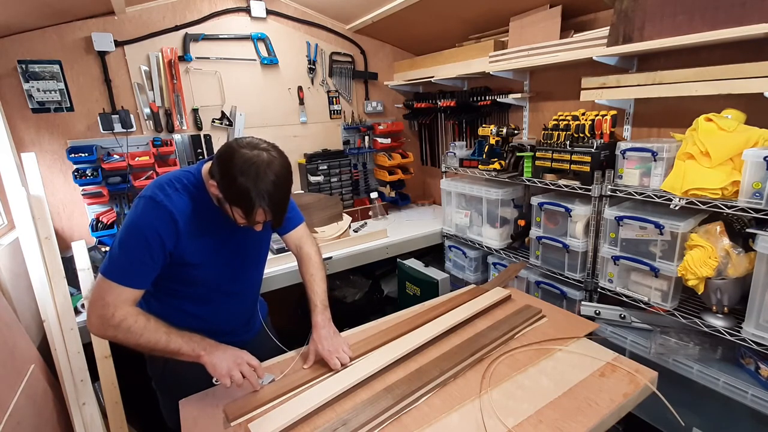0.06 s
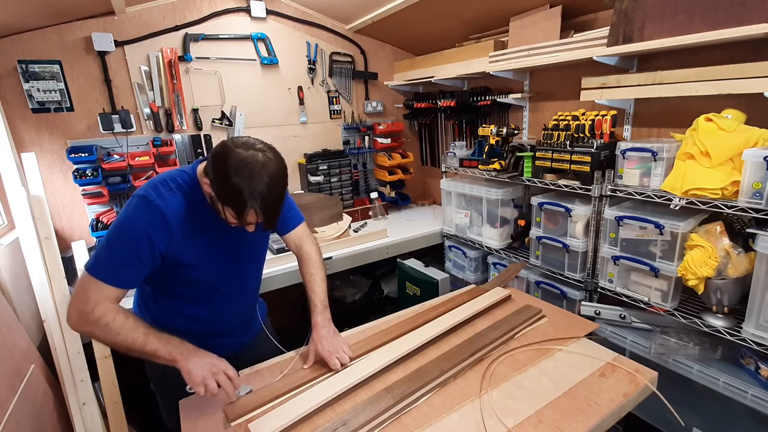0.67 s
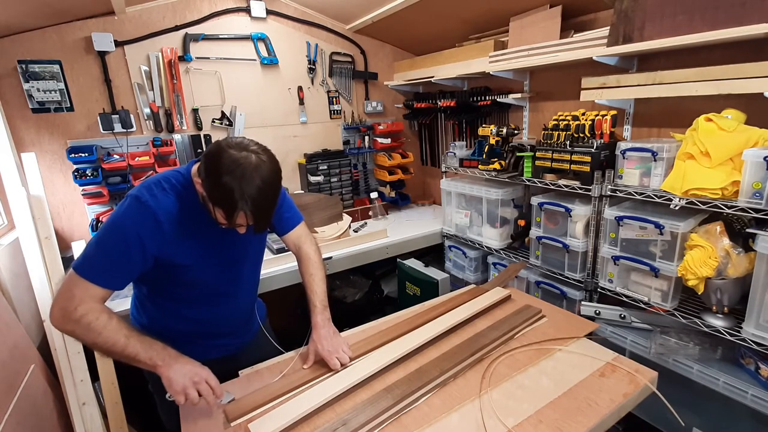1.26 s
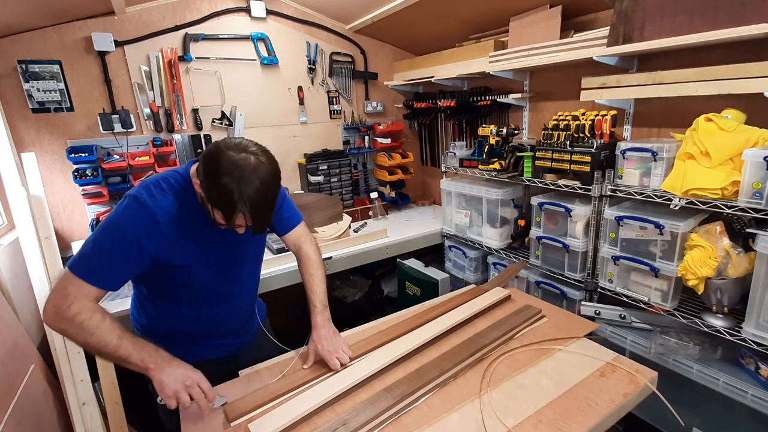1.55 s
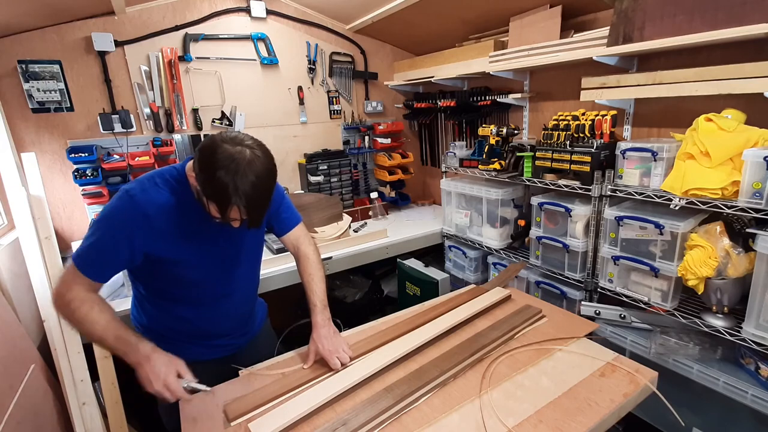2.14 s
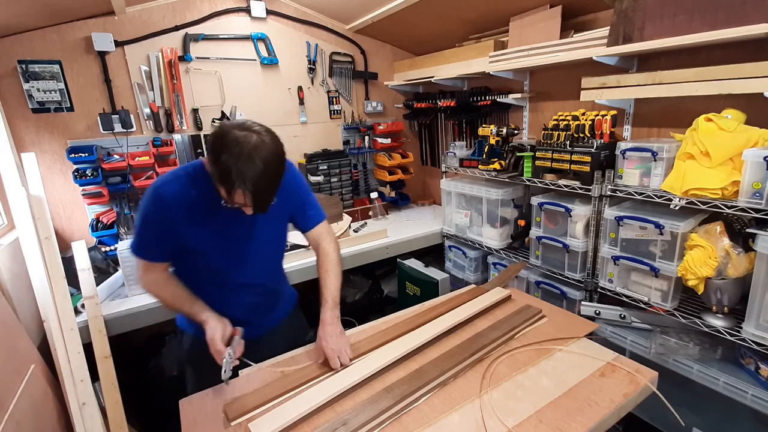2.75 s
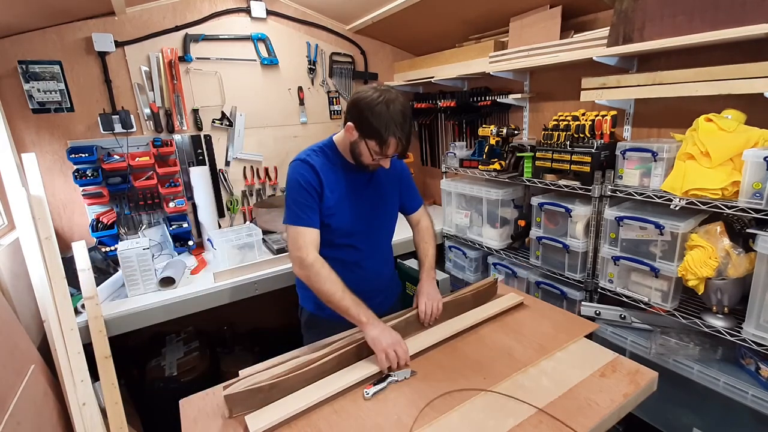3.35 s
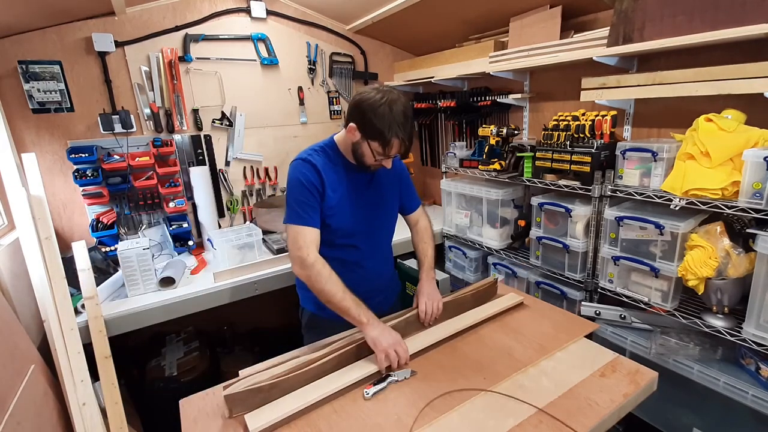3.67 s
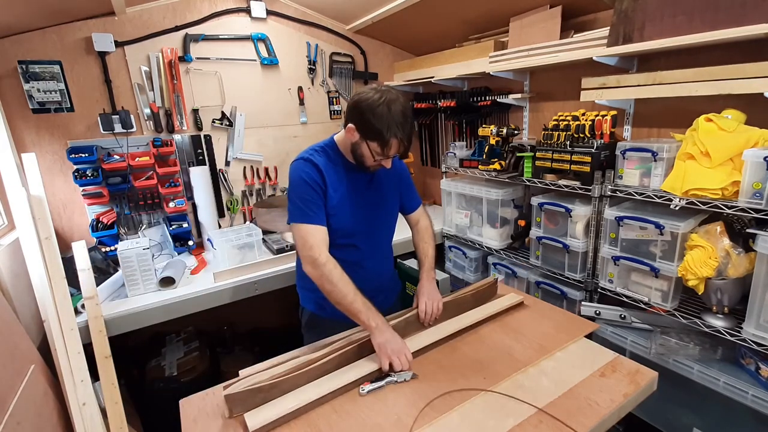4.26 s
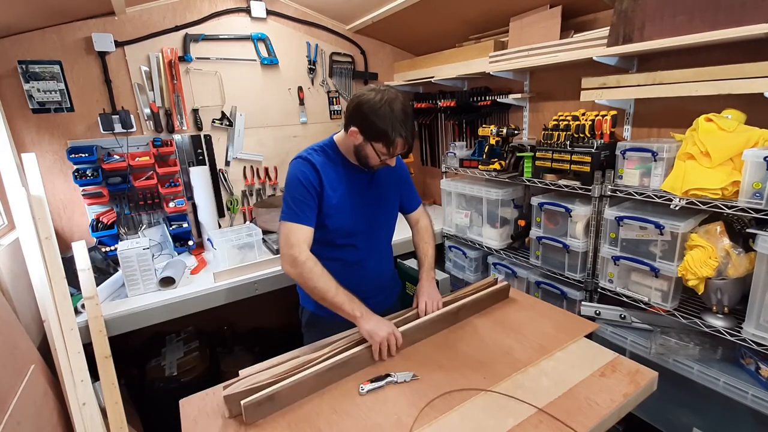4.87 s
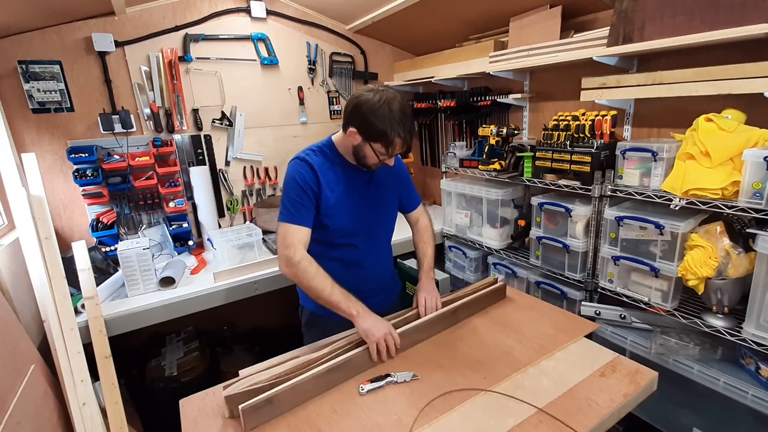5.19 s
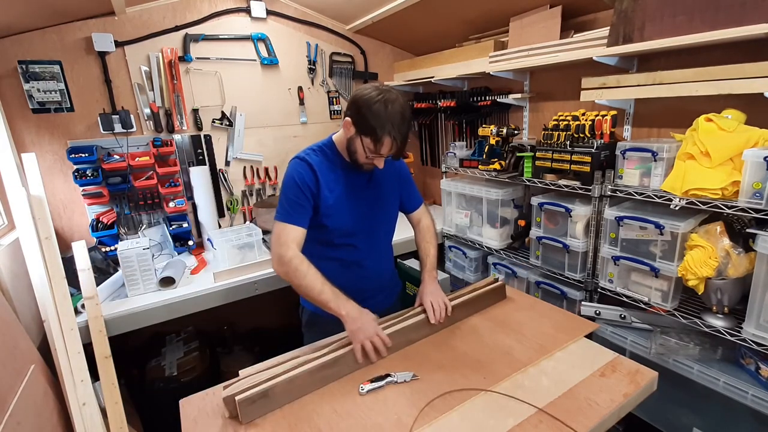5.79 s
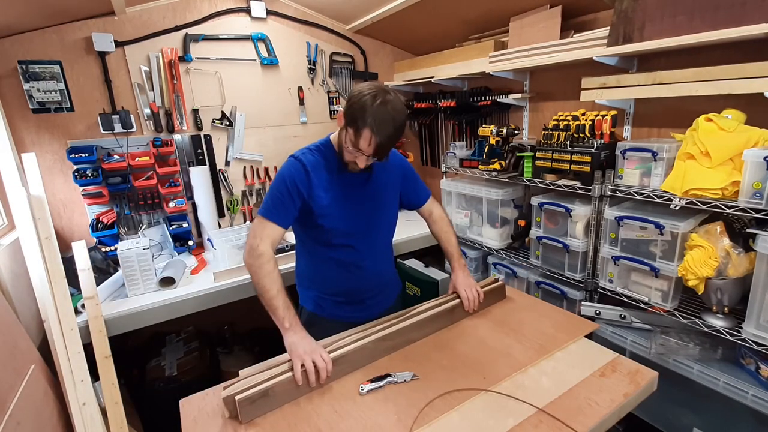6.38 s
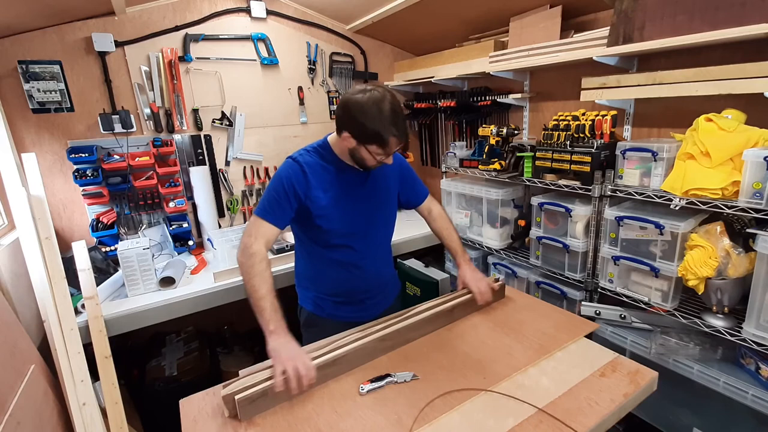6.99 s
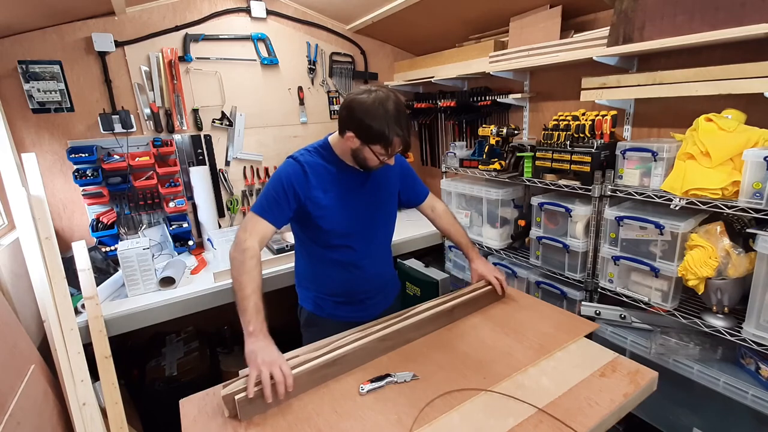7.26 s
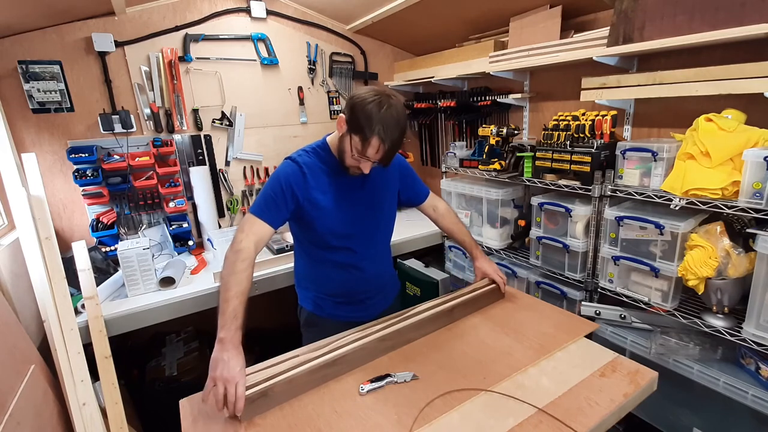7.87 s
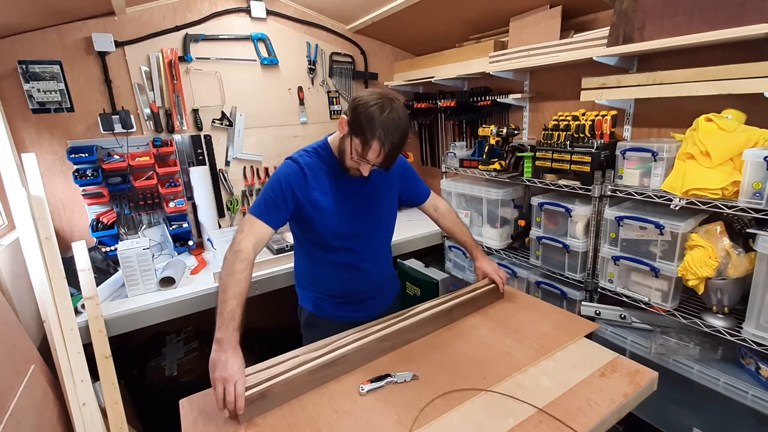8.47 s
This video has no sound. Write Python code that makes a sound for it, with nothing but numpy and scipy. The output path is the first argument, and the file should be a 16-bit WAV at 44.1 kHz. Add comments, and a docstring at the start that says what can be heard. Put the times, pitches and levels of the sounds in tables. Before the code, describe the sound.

Scratchy knife strokes cut a wood strip, followed by close cloth rustling and wood sliding and clacking on a workbench.

```python
"""A utility knife crackles through a thin wood strip on a bench in a small, crowded workshop: one long
stroke, one short. Near 2 seconds the loose blade ticks and wood clacks down. A shirt rustles against the
microphone worn on it and knocks it with a dry tap. From about 3 seconds the strips are lifted, slid and
stacked with light clacks; a second tap comes at 5.6 seconds, just before the loudest landing. Soft
sliding and rustling end the scene. A faint mains hum runs underneath it all."""
import sys
import numpy as np
from scipy import signal
from scipy.fft import rfft, irfft
from scipy.io import wavfile
from scipy.ndimage import uniform_filter1d

SR = 44100
rng = np.random.default_rng(int(sys.argv[2]) if len(sys.argv) > 2 else 0)


def unload_audio(sound):
    """Save the sound as a 16-bit wav file, at the path given as the first command line argument."""
    columns = np.transpose(np.atleast_2d(sound))
    # keep every value between -1 and 1, then stretch to whole-number steps
    steps = np.round(np.clip(columns, -1, 1) * 32767)
    wavfile.write(sys.argv[1], SR, steps.astype(np.int16))


N = 376349
RING = 14400  # samples set aside for one blow to die away
TIME, AGE = np.arange(N) / SR, np.arange(RING) / SR  # seconds into the scene, and since a blow

# The long stroke and the short finishing one, a list each. Each row: time in seconds, level in dB.
KNIFE_STROKES = [
    [(0.16, -61), (0.34, -55.5), (0.71, -55), (0.83, -60), (1.22, -61), (1.36, -57), (1.44, -52.5),
     (1.56, -64), (1.6, -58.5)],
    [(1.628, -54), (1.645, -46.5), (1.715, -49.5), (1.77, -65.5)],
]
# The tone of the cut's body, tearing fibres and hiss. Each row: frequency in Hz, level in dB.
BODY_TONE = [(150, -20), (250, -7), (363, -7), (513, -2), (660, -4.5), (827, -7), (908, -9), (1110, 4),
             (1430, -6.5), (2770, -18.5), (6000, -21), (7800, -59), (13200, -120)]
FIBRE_TONE = [(900, -11), (1500, 3), (1900, -0.5), (2250, 2), (2700, -3), (3400, -7), (4300, -5.5),
              (5400, -19), (8000, -23)]
HISS_TONE = [(3000, -21), (5500, -4.5), (7000, 2.5), (9500, -1.5), (12000, -22), (16000, -29.5)]
# Where the strip and the blade ring. Each row: pitch in Hz, width in Hz, level in dB.
STRIP_PEAKS = [(817, 170, 2), (1080, 170, -0.5)]
BLADE_PEAKS = [(1880, 56, 7), (2450, 240, -6), (2710, 150, 2.5), (3230, 120, -4), (3500, 150, -9),
               (4200, 650, -11)]
# The strip rings more freely as the blade nears its end. Each row: time in seconds, ring level in dB.
STRIP_FREEDOM = [(0.1, -21), (0.7, -12), (1.0, -6), (1.75, -1.5)]


def knife(body_db=-3, strip_db=-0.5, blade_db=-9.5, fibre_db=-6, hiss_db=-19, usual_cut_db=-56):
    """The blade parts fibres in a crackle that rings blade and strip; harder cutting hisses more."""
    effort = sum(swell(*np.transpose(stroke)) for stroke in KNIFE_STROKES) * undb(0.3 * wander(40))
    crackle = in_room(slips(per_s=2700, spread_db=4.5), direct_db=4.5)
    body = level(colour(crackle, BODY_TONE)) * undb(body_db)
    freedom_db = np.interp(TIME, *np.transpose(STRIP_FREEDOM))
    strip = resonate(crackle, STRIP_PEAKS) * undb(strip_db + freedom_db)
    blade = resonate(slips(per_s=2700, spread_db=4.5), BLADE_PEAKS) * undb(blade_db)
    tearing = in_room(slips(per_s=1900, spread_db=8.5), direct_db=-1.5)
    fibres = level(colour(tearing, FIBRE_TONE)) * undb(fibre_db)
    hiss = level(colour(slips(per_s=4400, spread_db=4), HISS_TONE)) * undb(usual_cut_db + hiss_db)
    hiss_gain = (effort / undb(usual_cut_db)) ** 1.56  # 1.56 dB more hiss for each dB of cutting
    return effort * (body + strip + blade + fibres) + hiss * hiss_gain


# Snags during the cut. Each row: start in seconds, level in dB.
SNAGS = [(0.3401, -36.5), (1.387, -28.5), (1.4436, -37), (1.4847, -36.5), (1.6428, -26.5), (1.7114, -41)]


def blade_snags():
    """The blade catches in the grain with a small snap."""
    tone = [(300, 10), (1000, 8.5), (3000, 5), (7000, 0.5), (10000, -14), (15000, -27)]
    return snaps(SNAGS, tone, room_db=-6, gain_db=10)


# Ticks of the blade. Each row: start in seconds, level in dB.
BLADE_TICKS = [(1.799, -63.5), (1.8491, -65.5), (1.868, -61), (2.0668, -65.5), (2.866, -78)]
# The notes of the steel. Each row: pitch in Hz, level in dB, seconds to fade by 60 dB.
STEEL_NOTES = [(1500, -13, .025), (2520, -1, 0.12), (2740, 9, 0.016), (3600, -6, .025), (4320, 4, 0.028),
               (4470, -12, .035), (5300, -16, .02)]


def blade_ticks(gain_db=34, click_db=-19, room_db=-17):
    """The loose steel blade clicks and rings briefly in its holder."""
    out = np.zeros(N)
    tone = [(400, 22), (1500, 26), (4500, 21), (7000, 6), (12000, -13)]
    for start, db in BLADE_TICKS:
        ring = ring_notes(STEEL_NOTES)
        click = colour(undb(click_db) * crack() + undb(room_db) * echoes(), tone)
        add(out, start, undb(db + gain_db) * (click + ring))
    return out


# The notes of the strips and bench. Each row: pitch in Hz, level in dB, seconds to fade by 60 dB.
WOOD_NOTES = [(156.4, -11, 0.22), (189.2, -4.5, 0.25), (240, -6.5, 0.13), (425, 3, 0.15), (464, 0, 0.16),
              (499, -6.5, 0.21), (681, -8.5, 0.27), (716, -3.5, 0.21), (785, 0, 0.19), (900, 3, 0.16),
              (977, 0.5, .17), (1063, -4, 0.17), (1279, 2.5, 0.18), (1574, 3, .16), (1640, -4, 0.15),
              (1850, 3.5, 0.15), (1920, -7, 0.2), (2000, -2.5, 0.14), (2305, -3, 0.18), (2660, -8.5, 0.086),
              (2900, 0, 0.12), (3200, -4, .13)]
# Wood landing on wood, and the knife running off onto the bench; the row at 4.2614 s is a crisp fold of the
# shirt, # given the same sharp sound. Each row: start in seconds, level in dB, # contact pitch in Hz, boost at
# that pitch in dB, bench bass in dB, middle tones in dB.
LANDINGS = [(1.8931, -49.5, 4500, 1, -17, -5), (1.9070, -40, 3200, 4, -9.5, 1.5),
            (2.1503, -61.5, 3870, -8, -6, -7), (3.3506, -50, 2100, -5, 8, -12),
            (3.377, -37, 2770, 7, 0.5, -1.5), (3.8923, -64.5, 3740, -4, -2, 0),
            (4.0710, -63.5, 2600, -10, 5, -3), (4.2614, -45, 3420, -8, 4, -6),
            (4.2715, -27.5, 1800, -8.5, -3.5, -7.5), (4.3260, -38, 1110, -6, -4.5, -8),
            (4.4027, -28, 3010, 8, -5, -6.5), (4.4041, -41.5, 5150, 9, -22, -16),
            (4.653, -56, 4060, -6, 11, 2), (4.784, -49.5, 840, 2, -15, -21),
            (4.808, -43.5, 3100, 5, 7, -22), (4.8101, -33.5, 2080, 2, -8.5, -7.5),
            (4.8679, -37, 2660, -3, -11.5, -2.5), (4.8870, -48.5, 2210, 4, 4, -5),
            (5.0956, -60, 2360, 0, -10, -4), (5.1773, -34, 2000, 4.5, 15.5, 9),
            (5.2029, -44, 1880, -3, 5, -1), (5.7390, -23.5, 2330, 2.5, -0.5, -0.5),
            (5.7500, -25, 1900, -8, -3.5, 2), (6.2656, -52.5, 1500, 1, -6.5, -2)]


def clacks(ring_db=-8, contact_octaves=0.4, gain_db=31.5):
    """Each landing is a crack, a short ring and echoes; a softer contact sounds duller."""
    out = np.zeros(N)
    for start, db, contact_hz, boost_db, bass_db, middle_db in LANDINGS:
        # Next to a middling landing (2500 Hz, -40 dB), hard contacts tick and crack more,
        # and light touches are mostly crack.
        hardness = np.log2(contact_hz / 2500)
        tick_db = -35.5 + 4 * hardness
        crack_db = -1.5 + 2 * hardness - 0.1 * (db + 40)
        blow = undb(crack_db) * crack() + undb(ring_db) * ring_notes(WOOD_NOTES) + echoes()
        body = [(40, bass_db - 14), (100, bass_db - 10.5), (175, bass_db + 1), (320, bass_db - 2.5),
                (430, bass_db), (850, middle_db), (2000, 0.0056)]
        tick = [(1000, tick_db), (6000, tick_db), (10000, tick_db - 11.5), (15000, tick_db - 25)]

        def gain_at(hz):
            """The contact rings at its own pitch and passes little above it."""
            bump_db = boost_db * np.exp(-(np.log2((hz + 1) / contact_hz) / contact_octaves) ** 2)
            dulling = np.hypot(1, (hz / contact_hz) ** 3.78)
            return undb(look_up(body, hz) + bump_db) / dulling + undb(look_up(tick, hz))
        add(out, start, undb(db + gain_db) * unit(shape(blow, gain_at)))
    return out


# Strips and fingers sliding along each other. Each row: middle in seconds, length in seconds,
# level in dB, brightness in dB per octave.
SLIDE_PUSHES = [(2.977, 0.033, -52, 0), (3.142, 0.32, -66, 3), (3.691, 0.065, -59.5, 1.5),
                (3.806, 0.064, -64.5, 0.5), (4.15, 0.37, -73, 4), (4.232, 0.044, -57.5, -1),
                (4.588, 0.086, -54, 1), (4.777, 0.15, -61.5, 4), (4.991, 0.15, -55.5, 1.5),
                (5.226, 0.093, -51, 1), (5.32, 0.12, -53, 0.5), (5.663, 0.11, -64.5, 0.5),
                (5.726, 0.033, -50.5, -1.5), (6.095, 0.28, -62, 2), (6.423, 0.12, -65, 0),
                (6.587, 0.097, -63, 0), (6.658, 0.056, -54.5, -0.5), (6.738, 0.039, -56, -2.5),
                (6.833, 0.069, -55.5, 0), (7.14, 0.17, -62, 2.5), (7.91, 0.039, -67.5, 0),
                (8.106, 0.12, -63, -1), (8.525, 0.084, -66.5, 1)]
# The tone of sliding wood. Each row: frequency in Hz, level in dB.
SLIDE_TONE = [(88, -25), (150, -2), (213, -13), (246, 5), (368, -15.5), (419, -3), (583, -6.5), (700, -5),
              (2100, -8), (3030, -18.5), (6320, -26.5), (12000, -39.5), (15600, -63.5), (22000, -120)]


def sliding(ring_db=-18, room_db=-4.5, uneven_db=1.5, pivot_hz=1000):
    """Wood rubs on wood in uneven steps and stirs the same notes as the clacks."""
    steps = slips(per_s=1800, spread_db=0) * undb(uneven_db * wander(45))
    one_step = crack() + undb(ring_db) * ring_notes(WOOD_NOTES) + undb(room_db) * echoes()
    rub = level(colour(signal.oaconvolve(steps, one_step)[:N], SLIDE_TONE))
    out = np.zeros(N)
    for middle, length, db, brightness in SLIDE_PUSHES:
        slide = rub * push(middle, length, abruptness=2.35)
        out += shape(slide, lambda hz: undb(db + brightness * np.log2((hz + 20) / pivot_hz)))
    return out


# Thin edges scuffing past each other. Each row: middle in seconds, level in dB,
# fade time to either side in seconds, pitch in Hz.
EDGE_SCUFFS = [(3.146, -61, 0.021, 1810), (3.68, -60, 0.031, 2790), (4.566, -61, 0.045, 2090),
               (4.747, -60, 0.053, 2230), (5.737, -43, 0.014, 2060), (3.255, -60, 0.012, 1700),
               (7.163, -58, 0.0095, 1500), (7.76, -58, 0.015, 1890)]


def scuffs(width_hz=600):
    """A short run of slips rings the strip's edge around one pitch."""
    out, rub = np.zeros(N), slips(per_s=3400, spread_db=3.5)
    for middle, db, fade_s, pitch_hz in EDGE_SCUFFS:
        grains = shape(rub[int(middle * SR):][:RING], lambda hz: peak(hz, pitch_hz, width_hz))
        rise_and_fall = np.exp(-((AGE - AGE.mean()) / fade_s) ** 2)
        add(out, middle - AGE.mean(), undb(db) * level(grains) * rise_and_fall)
    return out


# The shirt rubbing as the arms move. Each row: middle in seconds, length in seconds,
# crackle level in dB, low rub level in dB, creases in dB above the crackle.
ARM_MOVES = [(2.237, 0.11, -65, -61.5, -4), (2.319, 0.055, -51.5, -51.5, 0),
             (2.414, 0.081, -60.5, -55, 2.5), (2.605, 0.21, -65.5, -68, 1), (2.706, 0.031, -57, -47.5, -6),
             (2.78, 0.15, -67, -57, -10), (2.945, 0.12, -61, -64.5, -7), (5.477, .16, -63.5, -60.5, 0),
             (6.855, 0.081, -73, -51.5, -15), (6.967, 0.078, -52.5, -51.5, -7),
             (7.043, .07, -55.5, -55, -17), (7.34, 0.15, -62.5, -66, -0.5), (7.458, 0.075, -59.5, -60.5, 0),
             (7.62, 0.17, -52, -53.5, -12.5), (7.76, 0.021, -65, -61, -12)]
# The tone of the crackle and of the low rub. Each row: frequency in Hz, level in dB.
CLOTH_TONE = [(350, -35), (600, -7), (765, -0.5), (1070, 0), (1860, 4.5), (2710, -1.5), (3550, -1.5),
              (4840, -6), (8180, -17), (10300, -25), (15000, -41)]
LOW_RUB_TONE = [(40, -12.5), (80, -3), (150, 2), (280, -2.5), (500, -3.5), (800, -20), (1500, -48.5)]


def shirt_rustle(crackle_gain_db=1, low_gain_db=-1, uneven_db=2):
    """Threads catch and let go right at the microphone: dry crackle and stray creases over a low rub."""
    threads = slips(per_s=1400, spread_db=1.5) * undb(uneven_db * wander(110))
    crackle, low = level(colour(threads, CLOTH_TONE)), level(colour(threads, LOW_RUB_TONE))
    creases = level(colour(slips(per_s=75, spread_db=5), CLOTH_TONE))
    out = np.zeros(N)
    for middle, length, crackle_db, low_db, crease_db in ARM_MOVES:
        rustle = (crackle + undb(crease_db) * creases) * undb(crackle_db + crackle_gain_db)
        rub = low * undb(low_db + low_gain_db)
        out += (rustle + rub) * push(middle, length, abruptness=3.33)
    return out


# Folds in the shirt. Each row: start in seconds, level in dB.
FOLD_SLIPS = [(2.246, -36.5), (2.2682, -37), (2.2992, -27.5), (2.3134, -29.5), (2.3287, -29),
              (2.3507, -33.5), (2.373, -31), (2.3913, -37), (2.4216, -33.5), (2.5118, -36.5), (2.5537, -43),
              (2.6208, -39), (2.9894, -46), (5.437, -41.5), (5.54, -35), (7.318, -45.5), (7.4026, -40),
              (7.541, -28.5), (7.7401, -46)]


def shirt_folds():
    """The sharpest folds slip all at once, each with a crisp snap."""
    tone = [(80, -4.5), (300, 5), (1500, 3), (4500, 2), (9000, -12), (15000, -33)]
    return snaps(FOLD_SLIPS, tone, room_db=-7.5, gain_db=8)


# Clothing knocking the microphone: four faint touches, then two clear taps. Each row: start in seconds,
# level in dB, treble limit of the click in Hz, thump pitch in Hz, thump in dB above the click.
KNOCKS = [(2.6913, -54, 3000, 237, 4), (2.699, -67, 2460, 260, -16), (2.7071, -56, 4200, 267, -3),
          (2.714, -71, 3500, 240, 4), (2.8182, -45, 2910, 87, -3), (5.6001, -39.5, 2530, 143, -6)]


def microphone_taps(thump_s=0.0047, room_db=-21, gain_db=33):
    """Each knock is a dry click, followed by a thump as the microphone's clip sways and settles."""
    out = np.zeros(N)
    tone = [(50, -25), (120, 17.5), (280, 15.5), (800, 3), (1800, 4)]
    for start, db, limit_hz, thump_hz, thump_db in KNOCKS:
        knock = signal.unit_impulse(RING) + undb(room_db) * echoes()
        click = shape(knock, lambda hz: undb(look_up(tone, hz)) / np.hypot(1, (hz / limit_hz) ** 3.3))
        thump = np.sin(2 * np.pi * thump_hz * AGE) * np.exp(-AGE / thump_s)
        add(out, start, undb(db + gain_db) * (unit(click) + undb(thump_db) * unit(thump)))
    return out


# How long the workshop echoes. Each row: frequency in Hz, seconds to fade by 60 dB.
ECHO_TIMES = [(100, 0.49), (250, .24), (600, 0.2), (1500, 0.23), (3000, 0.18), (6000, 0.22), (12000, 0.14)]


def echoes(build_s=0.0018):
    """Dense echoes from shelves and walls; each band of frequencies dies away at its own speed."""
    noise, hz = rfft(rng.standard_normal(RING)), np.fft.rfftfreq(RING, 1 / SR)
    tail = np.zeros(RING)
    for band_hz, fade_s in ECHO_TIMES:
        band = look_up([(f, f == band_hz) for f, _ in ECHO_TIMES], hz)  # 1 here, 0 at the other bands
        tail += irfft(noise * band) * die_away(fade_s)
    return unit(tail * (1 - np.exp(-AGE / build_s)))


# The notes of the mains hum, and the tone of the still air. Each row: frequency in Hz, level in dB.
HUM_NOTES = [(49.8, -68.5), (150.3, -70.5), (249, -77.5), (451, -80.5), (550, -80)]
AIR_TONE = [(20, -25.5), (36, -22.5), (48, -4.5), (62, -4.5), (90, -13), (150, -11), (210, -18.5),
            (330, -19), (500, -17.5), (750, -24), (1100, -26), (2000, -30.5), (4000, -32.5), (15800, -34.5)]


def room_tone(waver_db=1, air_db=-67, hiss_db=-77):
    """Mains hum and still air in the middle, faint electronic hiss on each side."""
    hum = np.zeros(N)
    for hz, db in HUM_NOTES:
        strength = np.sqrt(2) * undb(db + waver_db * wander(5.3))
        hum += strength * np.sin(2 * np.pi * (hz * TIME + rng.random()))
    hiss_tone = [(60, 8.5), (500, 3), (2500, -12.5), (7000, 14.5), (15000, 17)]
    hiss = np.array([level(colour(rng.standard_normal(N), hiss_tone)) for _ in range(2)])
    air = level(colour(rng.standard_normal(N), AIR_TONE))
    return hum + undb(air_db) * air + undb(hiss_db) * hiss


def slips(per_s, spread_db):
    """Surfaces stick and slip in tiny random clicks; more spread makes their sizes less equal."""
    size = undb(spread_db * np.minimum(rng.exponential(size=N), 4))
    return level((rng.random(N) < per_s / SR) * size * rng.choice([-1, 1], N))


def snaps(table, tone, room_db, gain_db):
    """Single sharp slips, each a tiny burst of noise with a little of the room."""
    out = np.zeros(N)
    for start, db in table:
        burst = unit(rng.standard_normal(RING) * np.exp(-AGE / 0.002))
        add(out, start, undb(db + gain_db) * unit(colour(burst + undb(room_db) * echoes(), tone)))
    return out


def crack(spread_s=0.000458):
    """Bending waves travel faster at high pitch, so a blow spreads into a short falling chirp."""
    hz = np.fft.rfftfreq(RING, 1 / SR)
    return irfft(np.exp(-4j * np.pi * spread_s * np.sqrt(1000 * hz))) * np.exp(-AGE / 0.02)


def ring_notes(table, scatter_db=4.5):
    """A struck object rings with its own fading notes; each contact point stirs them differently."""
    size, side = rng.standard_normal((2, len(table)))
    strengths = np.sign(side) * undb(scatter_db * size)
    hz, db, fade_s = np.transpose(table)[:, :, None]
    notes = undb(db) * np.sin(2 * np.pi * hz * AGE) * die_away(fade_s)
    return unit(strengths @ notes)


def die_away(fade_s):
    """A gain that drops by 60 dB in the given time."""
    return np.exp(-np.log(1000) * AGE / fade_s)


def in_room(x, direct_db):
    """A sound from the bench at arm's length, with its echoes."""
    return level(undb(direct_db) * x + signal.oaconvolve(x, echoes())[:N])


def push(middle, length, abruptness):
    """Gain of one hand movement: it speeds up, holds and stops. An abruptness of 2 is a bell shape."""
    gain, span = np.zeros(N), samples(middle - 2 * length, middle + 2 * length)
    gain[span] = np.exp(-np.abs(2 * (span / SR - middle) / length) ** abruptness / 2)
    return gain


def swell(times, db, fade_s=0.072):
    """A gain that follows levels over time and fades to silence at both ends."""
    first, last = times[0] - fade_s, times[-1] + fade_s
    gain, span = np.zeros(N), samples(first, last)
    gain[span] = undb(np.interp(span / SR, np.r_[first, times, last], np.r_[-120, db, -120]))
    return gain


def samples(start, end):
    """The sample numbers between two times in seconds."""
    return np.arange(max(int(start * SR), 0), min(int(end * SR), N))


def wander(per_s):
    """A smooth random drift with a spread near one."""
    step = int(SR / per_s)
    stairs = np.repeat(rng.standard_normal(N // step + 1), step)
    return level(uniform_filter1d(stairs, step))[:N]


def peak(hz, pitch_hz, width_hz):
    """A gain of one at a pitch, falling off on both sides."""
    return 1 / np.hypot(1, 2 * (hz - pitch_hz) / width_hz) ** 2


def resonate(x, peaks):
    """Make a sound ring at the peaks of a table."""
    return level(shape(x, lambda hz: sum(undb(db) * peak(hz, f, w) for f, w, db in peaks) + undb(-60)))


def colour(x, tone):
    """Give a sound a tone. Each row of the tone: frequency in Hz, level in dB."""
    return shape(x, lambda hz: undb(look_up(tone, hz)))


def shape(x, gain_at, size=4096):
    """Filter a sound with a chosen gain at each frequency."""
    cepstrum = irfft(np.log(gain_at(np.fft.rfftfreq(size, 1 / SR))))
    cepstrum[1:size // 2] *= 2  # folded so that the filter rings after a click, never before
    cepstrum[size // 2 + 1:] = 0
    return signal.oaconvolve(x, irfft(np.exp(rfft(cepstrum))))[:len(x)]


def look_up(table, hz):
    """Read between the rows of a table, giving each octave equal room."""
    row_hz, value = np.transpose(table)
    return np.interp(np.log(hz + 1), np.log(row_hz), value)


def add(track, start, sound):
    """Mix a sound in at a time in seconds."""
    first = int(start * SR)
    track[first:first + len(sound)] += sound[:N - first]


def undb(db):
    """Turn decibels into a gain."""
    return 10 ** (np.asarray(db) / 20)


def unit(x):
    """Scale to a total energy of one."""
    return x / np.sqrt(np.sum(x ** 2))


def level(x):
    """Scale to an average (rms) level of one."""
    return x / np.std(x)


def scene():
    """All handling reaches one microphone, so it sits in the centre."""
    snags, folds = blade_snags(), shirt_folds()
    cutting = knife() + snags + blade_ticks()
    stacking = clacks() + sliding() + scuffs()
    return cutting + stacking + microphone_taps() + shirt_rustle() + folds + room_tone()


def record(dry, low_cut_hz=42, top_hz=15800):
    """The microphone drops the deep bass, and the highest treble is cut off."""
    thin = signal.sosfilt(signal.butter(4, low_cut_hz, "highpass", fs=SR, output="sos"), dry)
    return signal.sosfilt(signal.ellip(10, 0.1, 70, top_hz, fs=SR, output="sos"), thin)


dry = scene()
out = record(dry)
unload_audio(out)
```